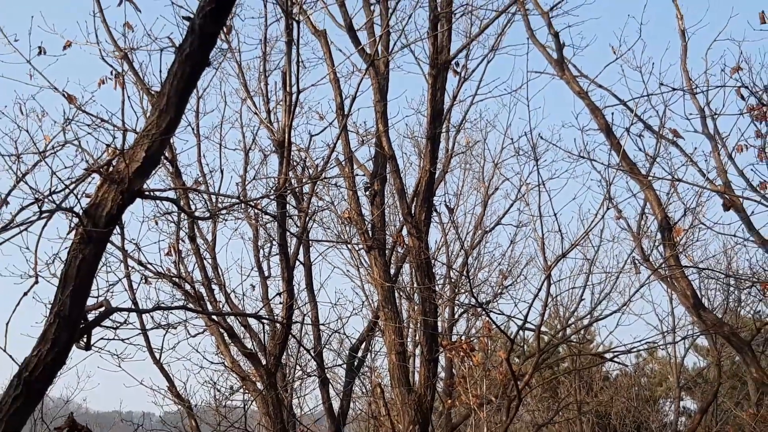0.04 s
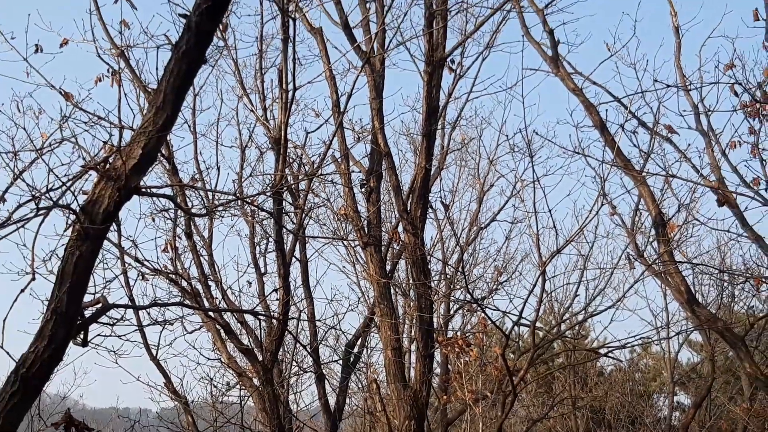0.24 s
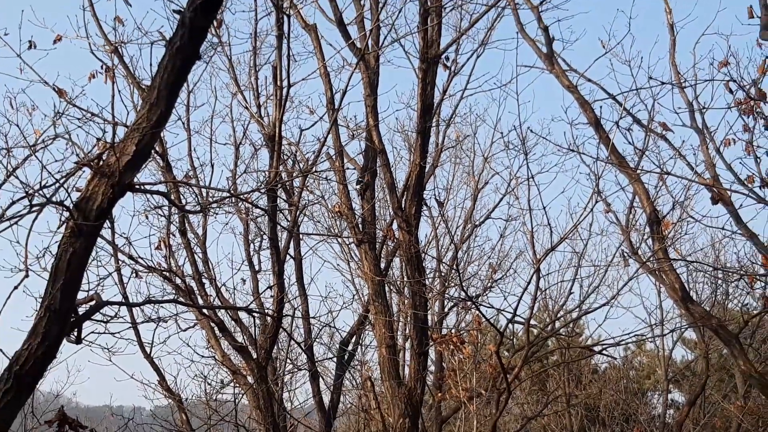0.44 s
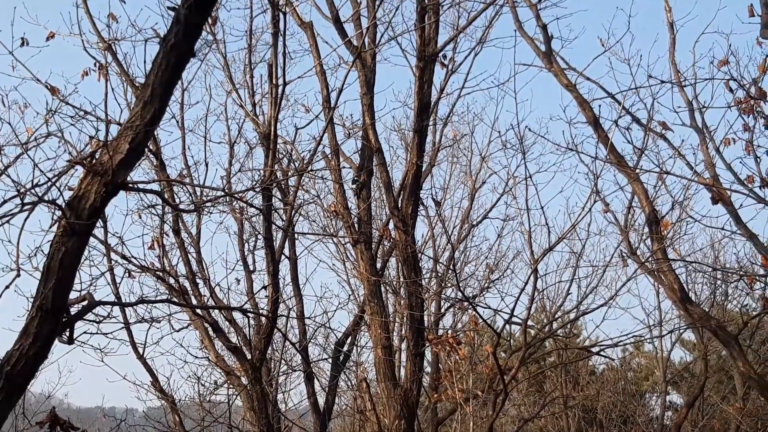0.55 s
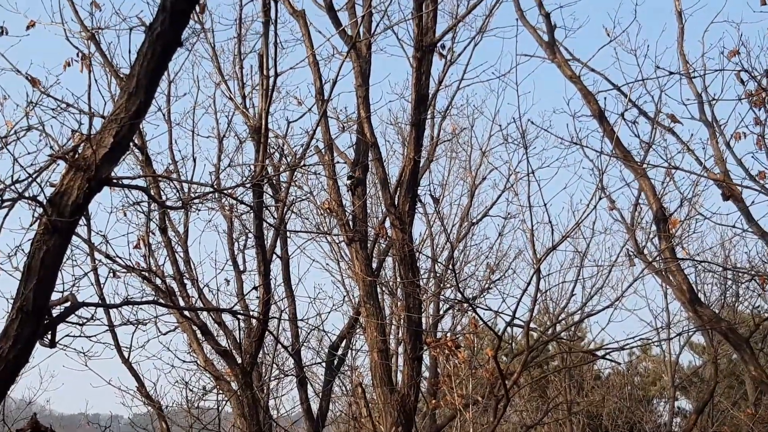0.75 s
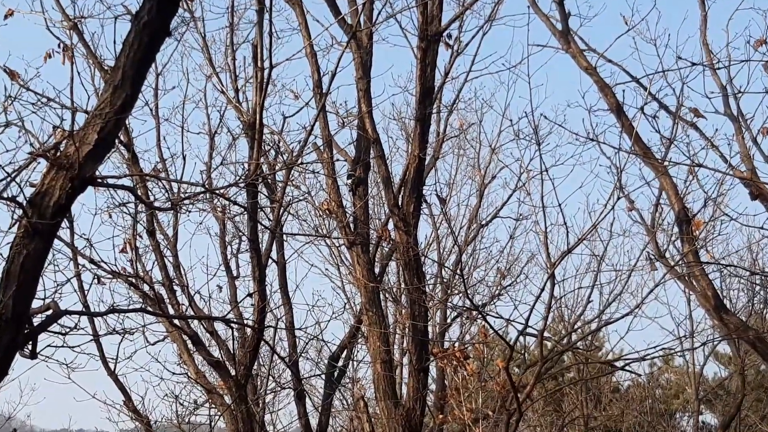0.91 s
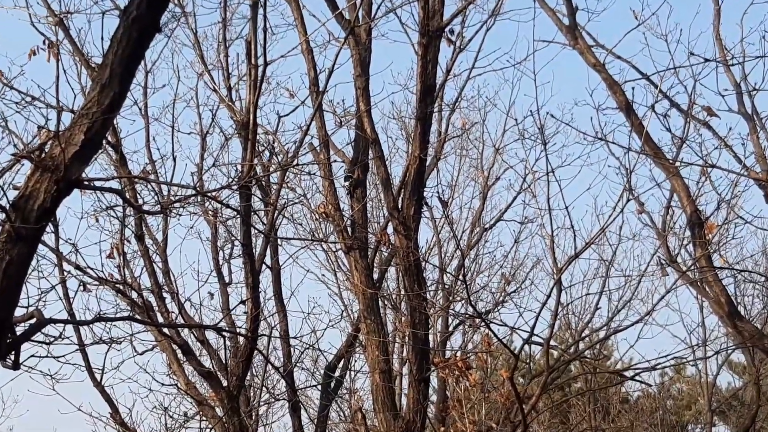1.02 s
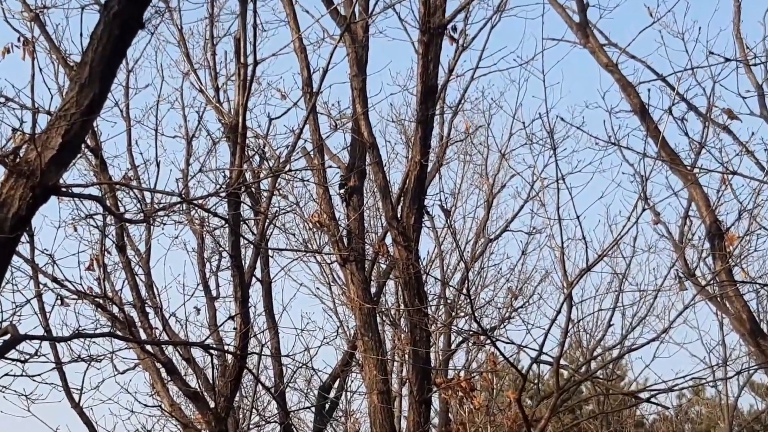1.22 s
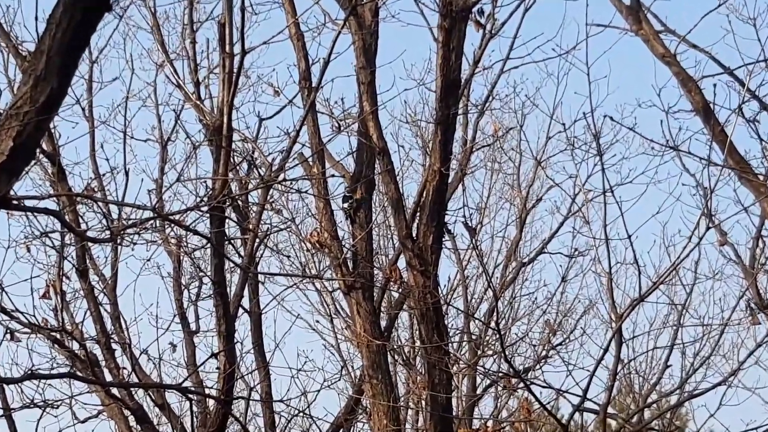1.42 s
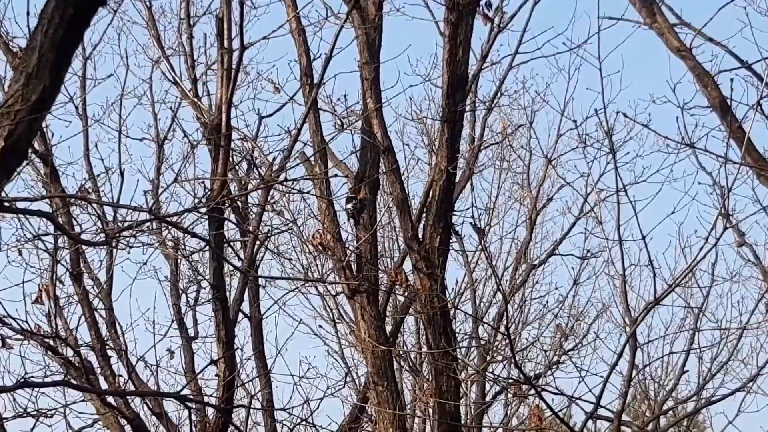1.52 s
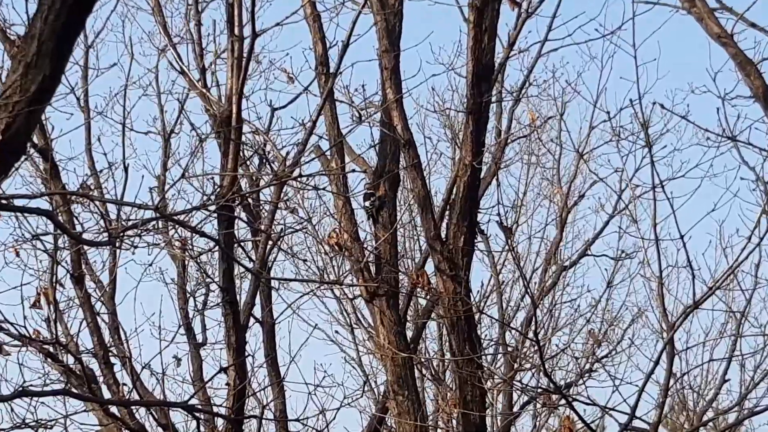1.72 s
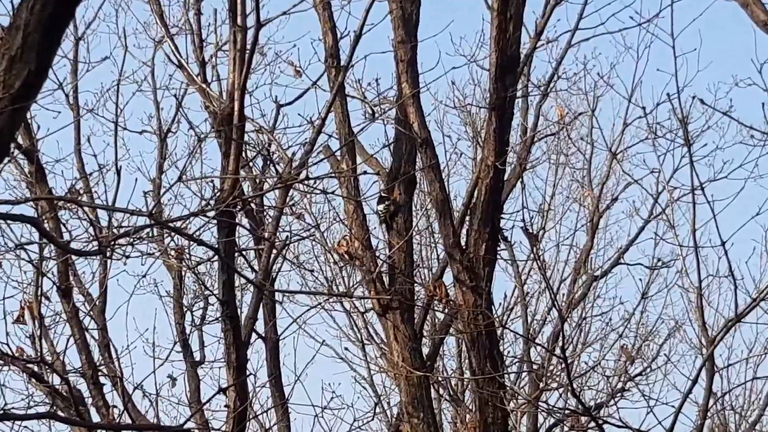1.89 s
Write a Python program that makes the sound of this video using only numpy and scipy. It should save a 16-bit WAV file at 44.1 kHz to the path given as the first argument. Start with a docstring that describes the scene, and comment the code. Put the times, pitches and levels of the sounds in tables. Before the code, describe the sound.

A woodpecker pecks a trunk in winter woods. After an opening echo, six dry knocks land at about 0.4, 0.75, 0.9, 1.3, 1.6 and 1.9 seconds, each echoing briefly. Low wind buffets the microphone, peaking near 0.3 seconds and easing by 0.7. A distant bird chirps very faintly at 0.1 and 0.6 seconds, then twice, higher, near 1.5. Nearly everything sits on the left, over faint hiss.

```python
"""A woodpecker chisels at a trunk in a bare winter wood. We open on the echo of a knock, then a gust
buffets the microphone. Six more dry knocks follow, some in loose pairs: each time the beak ticks, the
wood cracks and rings, and the trees scatter the sound back. A far-off bird calls thinly twice early
on, then twice at a higher pitch once the wind has eased. Nearly everything is on the left channel,
and a faint hiss runs throughout."""
import sys
import numpy as np
from scipy import signal
from scipy.fft import rfft, irfft
from scipy.io import wavfile
from scipy.ndimage import uniform_filter1d

SR = 44100
rng = np.random.default_rng(int(sys.argv[2]) if len(sys.argv) > 2 else 0)


def unload_wav(signal):
    """Save mono or channel-first audio to the path in sys.argv[1] as 16-bit WAV at rate SR, clipped to [-1, 1]."""
    wavfile.write(
        sys.argv[1],
        SR,
        np.round(np.clip(np.atleast_2d(signal).T, -1, 1) * 32767).astype(np.int16),
    )


N = 85995

# Blows of the beak. A tilt above 0 is brighter; fade_s is the time to die away by 60 dB at 1 kHz.
# start_s, level_db, tilt_db_per_octave, tick_db, tick_tilt_db_per_octave, echo_db, fade_s, fade_slope
PECKS = [(-.028, -0.5, 1.5, -11, 0, 5.5, .3, -0.79), (0.4163, -1.5, -1, 0.5, 15, 5, 0.27, -0.02),
         (0.7548, 0.5, -2, -5.5, 10, 4.5, 0.31, -0.54), (0.9002, -0.5, -4.5, -10, -1, 7.5, 0.2, 0.34),
         (1.2796, 1.5, -3, -2, -8, 5.5, 0.16, 0.18), (1.5730, 4, -3.5, -5.5, 5, 4, 0.27, -0.1),
         (1.9195, -1.5, -1, -4, 9, 8, 0.37, -0.5)]
def woodpecker():
    """Each blow is a tick of the beak and a crack that rings the trunk, followed by an echo."""
    lead, size = 256, 32768  # samples before the impact, and in the whole knock
    t = (np.arange(size) - lead) / SR
    blow = np.imag(signal.hilbert(signal.unit_impulse(size, lead)))  # one sharp pull and push
    trees = rng.standard_normal(size)
    out = np.zeros(N)
    for start, level_db, tilt, tick_db, tick_tilt, echo_db, fade_s, fade_slope in PECKS:
        knock = wood_crack(blow, t, tilt) + trunk_ring(t, tilt) + beak_tick(t, tick_db, tick_tilt)
        echo = tree_echo(trees, t, echo_db, tilt, fade_s, fade_slope)
        add(out, undb(level_db) * (knock + echo), start - lead / SR)
    return out


# Tone of the cracking wood: frequency_hz, level_db
CRACK_TONE = [(250, -32), (430, -41), (580, -7), (850, -1), (1500, 1.5), (1950, -3.5), (2450, -2),
              (2900, -19), (3600, -30), (12000, -60)]
# Bounces off the ground and nearby trunks: delay_s, level_db
BOUNCES = [(.00475, -17.5), (.0077, -24.5)]
def wood_crack(blow, t, tilt):
    """The struck wood cracks, and nearby surfaces send back quieter copies."""
    crack = with_energy(colour(blow, CRACK_TONE, tilt), db=-27.5)
    return crack + sum(undb(db) * np.interp(t - delay, t, crack) for delay, db in BOUNCES)


# The trunk's natural notes: pitch_hz, level_db, fade_s (time to die away by 60 dB)
TRUNK_NOTES = [(592, -5, .12), (712, -9, .06), (796, -6, .28), (888, 1, .1), (1020, 3, .08),
               (1226, -5, .06), (1345, -9, .12), (1458, 0, .085), (1530, -4, .06), (1701, -6, .08),
               (1870, -11, .06), (2147, -6, .07), (2275, -8, .06), (2519, -8, .06)]
def trunk_ring(t, tilt, level_db=-57.5, rise_s=0.0005):
    """The trunk vibrates briefly at many pitches, tuned a tiny bit differently at each blow."""
    after = np.maximum(t, 0)
    ring = 0
    for hz, db, fade_s in TRUNK_NOTES:
        detune = 1 + 0.001 * rng.standard_normal()
        fade = undb(db + tilt * np.log2(hz / 1000) - 60 * after / fade_s)
        ring += fade * np.sin(2 * np.pi * hz * detune * after)
    return ring * undb(level_db) * (1 - np.exp(-after / rise_s))


# Tone of the beak's tick: frequency_hz, level_db
TICK_TONE = [(2500, -58), (3500, -4), (4700, 15.5), (6500, 0), (8700, 5.5), (10300, -4), (15000, -30)]
def beak_tick(t, tick_db, tilt, decay_s=0.00084):
    """The beak meets the wood with a tiny burst of bright noise."""
    scrape = rng.standard_normal(len(t)) * np.exp(-np.abs(t) / decay_s)
    return with_energy(colour(scrape, TICK_TONE, tilt), db=tick_db - 44)


# Tone of the echo: frequency_hz, level_db
ECHO_TONE = [(300, -17.5), (460, -16), (580, -8), (800, 1.5), (1150, -5.5), (1550, -5.5), (1950, -8),
             (2550, -10.5), (3000, -31), (3700, -28.5), (4600, -16.5), (5600, -31.5), (8000, -26)]
def tree_echo(trees, t, echo_db, tilt, fade_s, fade_slope):
    """Many trunks scatter the knock into a quick tail and a faint, longer one from far away."""
    far_db, far_fade_s, rise_s = -24, 0.83, 0.0042
    spectrum = rfft(trees + 0.61 * rng.standard_normal(len(t)))  # partly new at each blow
    hz = np.fft.rfftfreq(len(t), 1 / SR)
    edges_hz = 180 * 2. ** np.arange(0, 7.1, .5)  # half-octave bands
    after = np.maximum(t, 0)
    tail = 0
    for low, high in zip(edges_hz, edges_hz[1:]):
        band = irfft(spectrum * ((hz >= low) & (hz < high)), len(t))
        band_fade_s = fade_s * (np.sqrt(low * high) / 1000) ** fade_slope  # slope < 0: highs die first
        tail += band * (undb(-60 * after / band_fade_s) + undb(far_db - 60 * after / far_fade_s))
    tail *= 1 - np.exp(-after / rise_s)
    return with_energy(colour(tail, ECHO_TONE, tilt), db=echo_db - 34)


# Rise and fall of the gusts: time_s, rumble_db, flutter_db
GUSTS = [(0.0, -66.5, -69.5), (0.048, -54, -69), (0.064, -41.5, -59), (0.096, -51.5, -67),
         (0.118, -43.5, -58), (0.152, -58, -49.5), (0.184, -47, -63), (0.2, -43.5, -64),
         (0.244, -38, -36.5), (0.26, -30, -30.5), (0.276, -27.5, -36), (0.298, -46, -55.5),
         (0.33, -38.5, -50), (0.352, -53.5, -64), (0.39, -52, -69), (0.45, -63.5, -66), (0.472, -51.5, -51),
         (0.488, -44.5, -50.5), (0.51, -64, -80), (0.536, -43, -56.5), (0.564, -60.5, -80),
         (0.602, -47, -48.5), (0.618, -42, -49), (0.646, -52.5, -64), (0.678, -53, -52.5), (0.71, -48, -69),
         (0.738, -68.5, -67), (0.862, -84.5, -93), (0.922, -73.5, -92), (1.08, -79.5, -98),
         (1.112, -61.5, -81), (1.184, -71.5, -78), (1.204, -57.5, -70), (1.248, -75.5, -100),
         (1.292, -78, -93), (1.34, -59.5, -74), (1.378, -49.5, -63), (1.438, -71.5, -79), (1.472, -48, -68),
         (1.564, -71.5, -82), (1.612, -61, -71.5), (1.786, -72, -88), (1.83, -66, -82), (1.878, -82, -97),
         (1.95, -78, -70)]
# Tones of the deep rumble and of the flutter above it: frequency_hz, level_db
RUMBLE_TONE = [(20, -36), (38, -17), (52, -3), (66, -1), (82, 1.5), (120, -2.5), (160, -12.5), (215, -35.5),
               (300, -53.5), (700, -100)]
FLUTTER_TONE = [(110, -21), (160, -5), (190, -1), (285, -10), (350, -25.5), (450, -29), (750, -49.5),
                (1500, -81), (4000, -115)]
def wind(t, split_hz=350):
    """Swirling air thumps and flutters on the microphone; stronger gusts sound brighter."""
    times, rumble_db, flutter_db = np.array(GUSTS).T
    rumble_db, flutter_db = np.interp(t, times, rumble_db), np.interp(t, times, flutter_db)
    flutter = swirls(FLUTTER_TONE)
    lows = signal.sosfiltfilt(signal.butter(2, split_hz, fs=SR, output="sos"), flutter)
    highs = (flutter - lows) * undb(0.16 * (flutter_db + 43))  # boosted when flutter_db tops -43
    return undb(rumble_db + 7) * swirls(RUMBLE_TONE) + undb(flutter_db + 5.5) * (lows + highs)


def swirls(tone):
    """The pressure of churning air: noise with the given tone, held at an even level."""
    noise = colour(rng.standard_normal(N), tone)
    power = uniform_filter1d(uniform_filter1d(noise ** 2, size=700), size=700)
    return noise / np.sqrt(power)


# Thin bird calls: start_s, length_s, pitch_hz, level_db
CHIRPS = [(0.113, 0.031, 3950, -78), (0.594, 0.027, 4050, -77.5), (1.463, 0.033, 6700, -73.5),
          (1.488, 0.063, 6940, -77.5)]
def small_bird(t, waver=0.0447):
    """A far-off bird gives faint, high, wavering whistles."""
    out = np.zeros(N)
    for start, length, hz, db in CHIRPS:
        progress = np.clip((t - start) / length, 0, 1)
        swell = np.sqrt(np.maximum(np.sin(np.pi * progress), 0))
        pitch_hz = hz * (1 + waver * drift(rate_hz=2500))
        out += undb(db) * swell * np.sin(2 * np.pi * np.cumsum(pitch_hz) / SR)
    return out


# Slow swell of the open air: time_s, level_db
AIR_SWELL = [(0, 3), (.3, 5), (.6, 2.5), (1., 0.5), (1.45, 2), (1.95, 0.5)]
# Tone of the air and hiss on each side: frequency_hz, level_db
AIR_LEFT_TONE = [(30, 5), (52, 15), (90, 7), (180, -0.5), (290, 9.5), (500, 4.5), (800, 3.5), (1200, -3),
                 (2000, -4), (3200, -9.5), (4400, -6.5), (5600, -8), (10000, -9), (15000, -8.5)]
AIR_RIGHT_TONE = [(30, 19), (85, -4.5), (150, 3), (280, 5.5), (420, -1), (800, 1), (1100, -4), (2200, -5.5),
                  (6000, -11), (10000, -9.5), (13000, -5.5), (15000, -8.5)]
def air(t):
    """The open air murmurs, easing with the wind, along with the microphones' own hiss."""
    swell_db = np.interp(t, *np.array(AIR_SWELL).T)
    left = unit(colour(rng.standard_normal(N), AIR_LEFT_TONE))
    left *= undb(-76 + swell_db - 0.88 * drift(rate_hz=31))
    right = unit(colour(rng.standard_normal(N), AIR_RIGHT_TONE))
    right *= undb(-77.5 + 0.68 * swell_db)
    return np.array([left, right])


def undb(db):
    """Turn decibels into a volume multiplier."""
    return 10 ** (np.asarray(db) / 20)


def unit(x):
    """Scale to an average (rms) level of 1."""
    return x / np.sqrt(np.mean(x ** 2))


def with_energy(x, db):
    """Scale a short sound to a total energy in dB."""
    return x * undb(db) / np.sqrt(np.sum(x ** 2))


def colour(x, tone, tilt=0):
    """Shape a sound with a tone table, tilted in dB per octave around 1 kHz."""
    tone_hz, tone_db = np.array(tone, float).T
    hz = np.maximum(np.fft.rfftfreq(len(x), 1 / SR), 1)
    octaves = np.clip(np.log2(hz / 1000), -2, 3)
    gain_db = np.interp(np.log(hz), np.log(tone_hz), tone_db) + tilt * octaves
    return irfft(rfft(x) * undb(gain_db), len(x))


def drift(rate_hz):
    """A smooth random wobble with a typical size of 1."""
    hold = int(SR / rate_hz)
    steps = np.repeat(rng.standard_normal(N // hold + 1), hold)
    return unit(uniform_filter1d(uniform_filter1d(steps, hold), hold)[:N])


def add(out, x, start_s):
    """Mix x into out from a start time."""
    offset = int(round(start_s * SR))
    first, last = max(offset, 0), min(offset + len(x), len(out))
    out[first:last] += x[first - offset:last - offset]


def scene():
    """Birds and wind are on the left; the right carries little but hiss."""
    t = np.arange(N) / SR
    gusts = wind(t)
    left = woodpecker() + small_bird(t) + gusts
    right = undb(-61) * gusts
    return np.array([left, right]) + air(t)


def record(dry, low_cut_hz=50, high_cut_hz=15650):
    """The recorder trims the deepest rumble and the highest treble."""
    trimmed = signal.sosfilt(signal.butter(4, low_cut_hz, "high", fs=SR, output="sos"), dry)
    return signal.sosfilt(signal.ellip(10, .2, 70, high_cut_hz, fs=SR, output="sos"), trimmed)


dry = scene()
out = record(dry)
unload_wav(out)
```